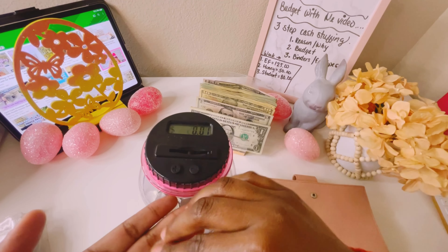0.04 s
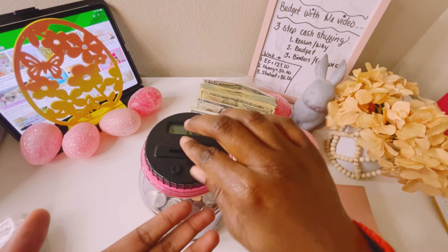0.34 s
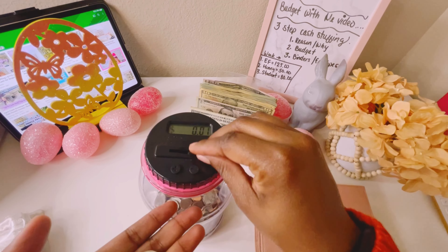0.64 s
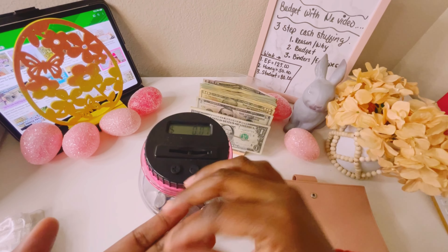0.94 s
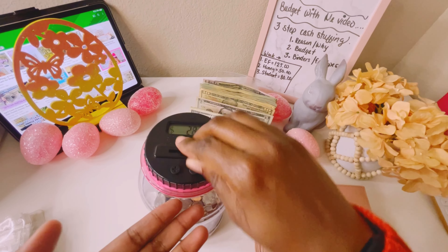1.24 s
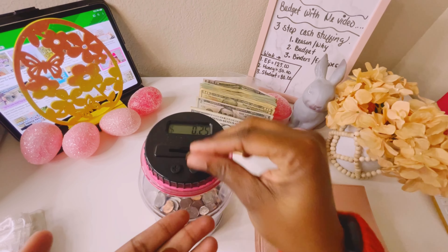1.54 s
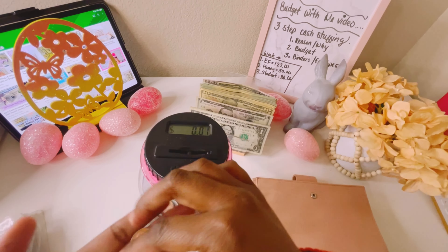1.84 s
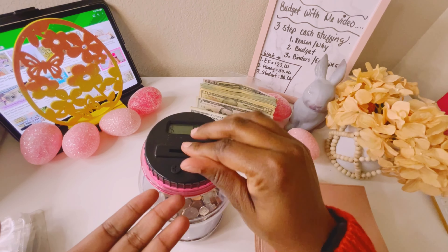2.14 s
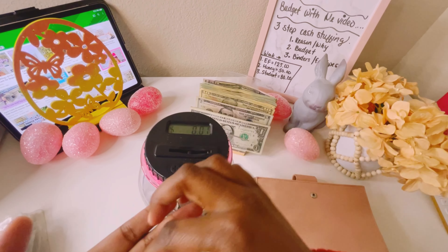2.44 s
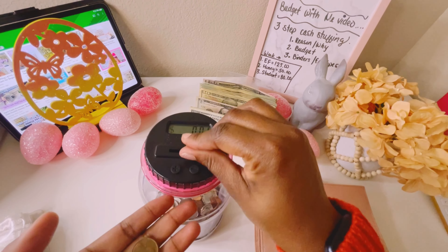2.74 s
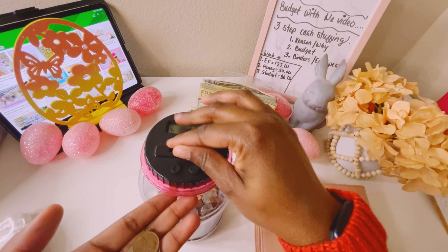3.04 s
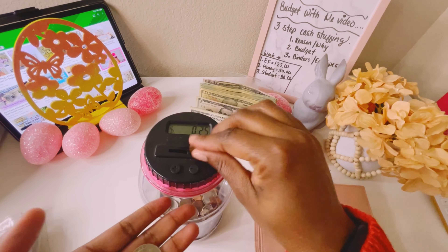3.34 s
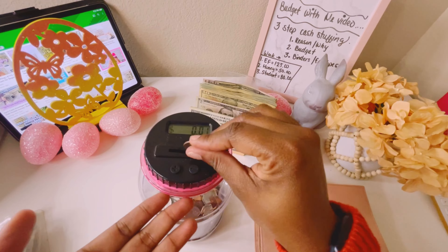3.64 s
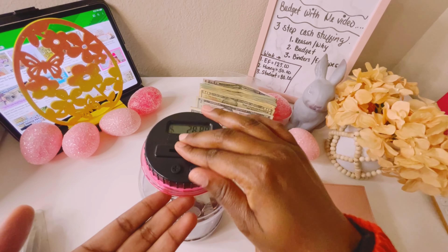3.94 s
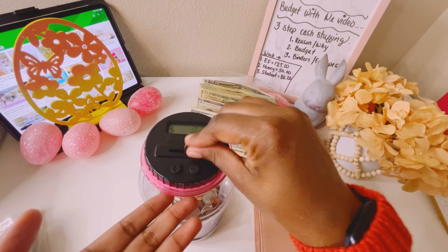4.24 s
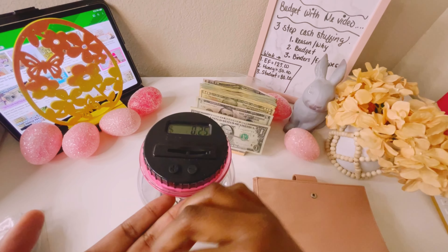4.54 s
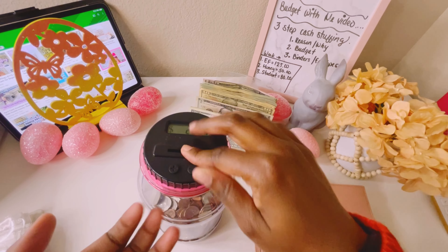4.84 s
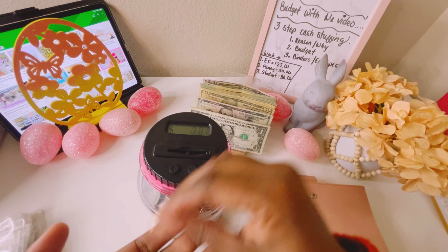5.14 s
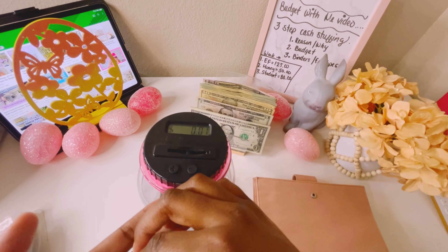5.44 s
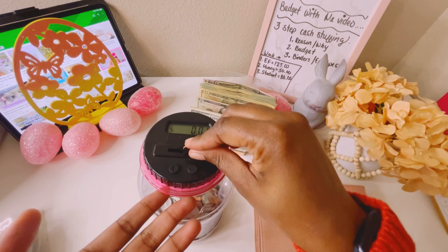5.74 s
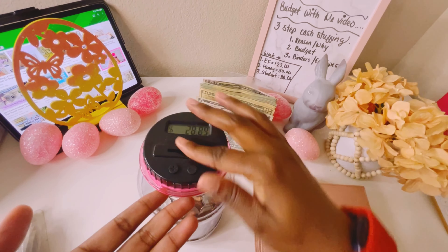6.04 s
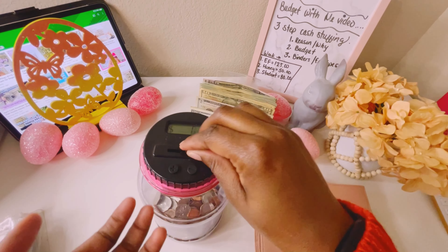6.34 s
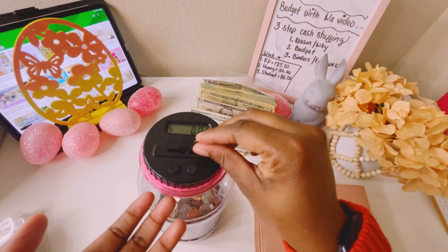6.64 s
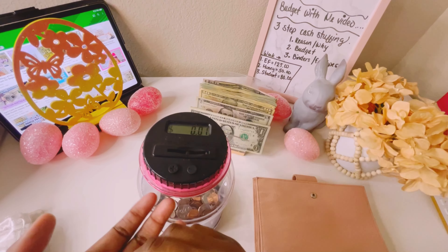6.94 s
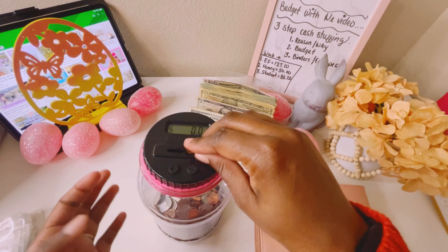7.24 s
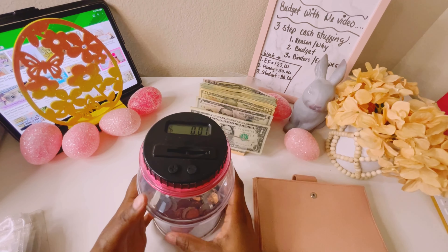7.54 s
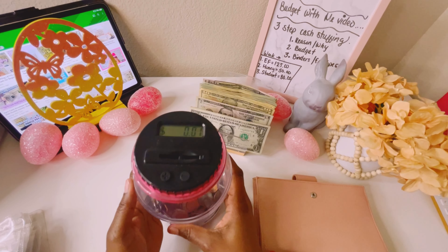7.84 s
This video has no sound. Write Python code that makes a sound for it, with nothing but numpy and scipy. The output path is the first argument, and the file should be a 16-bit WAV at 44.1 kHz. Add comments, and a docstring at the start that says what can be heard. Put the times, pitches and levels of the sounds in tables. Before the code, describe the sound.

Coins are pushed one after another through the sprung slot in the lid of a plastic jar, close to the microphone on a desk in a small room. Each taps and scrapes, the flap snaps back, and the coin lands on the pile with a brief jingle. Spare coins clink faintly in a palm. Near the end fingers softly rub the jar, and a steady appliance hum drops to a lower drone with a soft rustle.

```python
"""Coins snap one by one through the sprung slot in the lid of a plastic counting jar, close up on a desk. Coins
tap on the lid or the pile and scrape in the slot; the flap snaps back, and each coin drops inside. Every
contact rings the lid, the coin, the jar's wall and the air within. Spare coins clink in the palm and fingers
rub on the jar. An appliance hums in the small room; near the end the background gives way abruptly to a low
drone, with a soft rustle."""
import sys
import numpy as np
from scipy import signal
from scipy.fft import rfft, irfft, next_fast_len
from scipy.io import wavfile
from scipy.ndimage import map_coordinates

SR = 44100
rng = np.random.default_rng(int(sys.argv[2]) if len(sys.argv) > 2 else 0)


def inscribe(sig):
    """Save sig as 16-bit PCM at rate SR to the path in sys.argv[1].

    A 1-D sig is mono; a 2-D sig holds one channel per row.
    Samples are clipped to [-1, 1] before scaling.
    """
    pcm = np.round(np.clip(np.atleast_2d(sig).T, -1, 1) * 32767)
    wavfile.write(sys.argv[1], SR, pcm.astype(np.int16))


N = 356317

# Knock is the jar's dull body relative to a hit's level; treble is the coin's tick over the lid's clack.
# a coin goes through the slot: snap t/s, snap level/dB, knock/dB, treble/dB, rebound level/dB,
# fall time/s, landing level/dB, landing treble/dB, settling level/dB
COIN_DROPS = [(.0035, -19.5, -18, 2.5, -30.5, 0.033, -33, -4.5, -52.5),
              (0.3857, -18.5, -15.5, 6, -22, 0.033, -28.5, -7.5, -36.5),
              (0.8047, -16.5, -16, 4, -29.5, 0.028, -24, 1, -54.5),
              (1.35, -19.5, -10.5, -4, -15.5, 0.031, -24, -1, -44.5),
              (1.7513, -17.5, -15.5, 2, -29.5, 0.032, -26, -4, -46),
              (2.3209, -14, -14, 5, -33.5, 0.042, -23.5, -.5, -37),
              (3.0898, -19.5, -24.5, 1, -37, 0.024, -24, -8, -36.5),
              (3.4277, -16.5, -21.5, 5, -15.5, 0.025, -27.5, 2, -36),
              (3.9454, -17.5, -28, 3.5, -40, 0.021, -23.5, -5, -40),
              (4.4363, -17.5, -28, -2.5, -30, .0246, -21, -1.5, -48),
              (4.8211, -20, -16, 1, -22.5, .0359, -25.5, -4.5, -35.5),
              (5.319, -17, -22.5, 3.5, -18.5, 0.029, -19.5, 4.5, -37.5),
              (6.0197, -16, -14, 0, -28.5, 0.027, -28.5, -3, -37.5),
              (6.415, -19, -24.5, 3.5, -17, 0.036, -20, -3.5, -48),
              (6.8572, -15.5, -22.5, 5.5, -35.5, .0229, -21.5, 1, -42.5),
              (7.2916, -15.5, -18, 3, -20, 0.031, -22, 2.5, -46)]
# a coin taps on the lid or on the pile in the jar, and skips: t/s, level/dB, treble/dB
COIN_TAPS = [(0.188, -29, -7), (0.1997, -31.5, -5.5), (.248, -44.5, -4), (0.304, -37.5, -6.5),
             (0.6207, -27, -11.5), (.706, -44.5, -1), (0.723, -36.5, -2), (0.7802, -19, -1),
             (.822, -20.5, -5), (1.0422, -24.5, -18), (1.063, -24.5, -6.5), (1.2055, -25, -2.5),
             (1.2457, -31, -10), (1.2638, -44.5, 4), (1.6, -25.5, -7), (1.7046, -37.5, 2),
             (2.0493, -33, -6.5), (2.0832, -38.5, -2.5), (2.1127, -31.5, 6), (2.3437, -28, -1.5),
             (2.5842, -26, 1.5), (2.6616, -51, -11), (2.7028, -26, -2), (2.9, -45.5, -22),
             (2.9157, -33, -10), (2.9442, -32, -13.5), (2.9818, -32.5, -15), (2.9935, -24.5, -5),
             (3.016, -26.5, -0.5), (3.0705, -18.5, -12), (3.1684, -35.5, -1.5), (3.2997, -27.5, -8.5),
             (3.3597, -27.5, -1.5), (3.371, -27.5, 7.5), (3.641, -29.5, -20), (3.653, -25.5, -9.5),
             (3.6854, -28.5, -10), (3.7456, -39.5, -13), (3.7983, -29.5, 4), (3.842, -27, -10),
             (4.187, -34, 6), (4.216, -33, -9.5), (4.2774, -34.5, -11), (4.3186, -39, 2), (4.3736, -29, -7),
             (4.4171, -29.5, 4), (4.623, -52.5, -3), (4.67, -29.5, -4.5), (4.71, -47, 6),
             (4.7414, -41.5, 4), (4.776, -38.5, -2.5), (5.2137, -26, -8.5), (5.2643, -34, 2.5),
             (5.5628, -28, -5.5), (5.661, -24.5, -2.5), (5.8097, -39, -2), (5.9446, -22, -3.5),
             (6.093, -34.5, 0.5), (6.237, -55, 0), (6.272, -33, -3), (6.305, -30.5, 2), (6.3205, -31, 13.5),
             (6.36, -32, -4.5), (6.492, -37.5, 1), (6.6463, -37.5, -14), (6.6938, -28.5, 0.5),
             (6.7689, -31, -3.5), (6.803, -38, -1.5), (6.958, -38.5, -2.5), (6.9766, -33, 0),
             (7.169, -33.5, -1.5), (7.2065, -33, 3.5)]
# a coin scrapes in the slot: start t/s, end t/s, level/dB, knock/dB, treble/dB
SLOT_SCRAPES = [(0.033, 0.058, -39, -8, -1.5), (0.638, 0.673, -50, -2.5, -4),
                (1.043, 1.072, -33.5, -5.5, -11.5), (1.139, 1.171, -52, 2, -13),
                (1.193, 1.227, -32.5, -2, -10), (1.718, 1.751, -52, 2.5, -7.5),
                (2.314, 2.319, -19.5, -9.5, 1.5), (2.716, 2.748, -42, -0.5, 0),
                (2.996, 3.043, -31.5, -4.5, -9), (3.07, 3.087, -29, -1, -4),
                (3.785, 3.851, -36.5, -1.5, -14), (3.933, 3.945, -30, -2.5, -8),
                (4.18, 4.186, -28.5, -7.5, -13.5), (4.267, 4.299, -44, 1.5, -5),
                (4.357, 4.387, -32, -4, -5.5), (4.41, 4.436, -23.5, -8, -10.5), (4.75, 4.81, -54, -1, -10),
                (5.795, 5.817, -47, 1.5, -6), (5.935, 5.974, -31.5, -2.5, -4.5),
                (6.007, 6.019, -21.5, -7.5, -9), (6.409, 6.417, -23, -14.5, 5)]
# resonances of lid, coin, jar wall, enclosed air and palm-held coin rims: f/Hz, width/Hz, level/dB
LID_MODES = [(2760, 300, -4), (3158, 120, 0), (3340, 110, -3), (3624, 140, 5), (3928, 810, -1.5),
             (4675, 91, -1), (4673, 340, -0.5), (5260, 280, -0.5), (5690, 890, -6.5)]
COIN_MODES = [(7060, 4500, -4), (8020, 150, 4), (9920, 520, 3), (10800, 800, -2.5), (11270, 760, 0),
              (12750, 280, -6), (12900, 2200, -5), (15440, 600, -3), (14900, 430, -6)]
WALL_MODES = [(729, 190, -5.5), (847, 137, 1), (1190, 100, 0.5), (1387, 150, 0), (1777, 280, -6)]
CAVITY_MODES = [(389.6, 60.4, 7.5), (435, 93, -2)]
RIM_MODES = [(9500, 4500, -17.5), (11100, 540, -12.5), (14100, 680, -0.5), (15500, 450, -1.5),
             (17370, 1100, 6)]
# coins slide over each other in the palm: start t/s, length/s, level/dB
PALM_SLIDES = [(0.052, 0.0087, -42), (0.905, .033, -40.5), (1.467, 0.039, -38.5), (1.857, .008, -47),
               (2.434, 0.03, -35.5), (3.222, 0.0088, -32.5), (3.547, 0.0096, -46.5), (4.041, 0.022, -45),
               (5.126, .002, -32), (5.441, 0.048, -40)]
# fingers slide on the jar: middle t/s, length/s, level/dB
FINGER_RUBS = [(0.497, .1, -65), (1.478, 0.093, -61), (2.551, .12, -65.5), (3.23, .1, -60.5),
               (4.084, .15, -62.5), (5.82, .14, -63), (6.152, 0.073, -68), (7.188, 0.17, -64.5),
               (7.372, 0.067, -49.5), (7.518, 0.21, -67.5), (7.685, .04, -60)]
# fingernails tick on the jar: t/s, level/dB
NAIL_TICKS = [(7.473, -56), (7.574, -65), (7.666, -53)]
# the small room's decay: f/Hz, t60/s
ROOM_DECAY = [(300, .35), (1100, 0.36), (2200, 0.25), (4500, 0.15), (8000, 0.078), (15000, 0.022)]
# partials of the appliance's hum and of the low drone: f/Hz, level/dB
HUM_PARTIALS = [(88.9, -66), (177.8, -48.5), (182.4, -51.5), (193.6, -53.5), (223, -59.5), (255.5, -70),
                (266.8, -45.5), (283, -65), (365.2, -57), (444.6, -62.5)]
DRONE_PARTIALS = [(59.2, -45), (62, -64), (86.1, -46), (89, -54), (118.4, -58), (145.3, -56.5)]
# noise colours of skin on plastic, the room's air and the rustle: f/Hz, level/dB
RUB_COLOUR = [(200, -38.5), (500, -7.5), (800, 1.5), (1200, -1.5), (1600, -10), (3000, -11.5), (7000, -18),
              (15000, -19.5)]
AIR_COLOUR = [(30, -30), (90, -21), (130, -4), (180, 2), (220, -5), (270, 10), (315, -3.5), (390, -2.5),
              (500, -10), (650, -16.5), (1200, -28.5), (2500, -41), (6000, -45.5), (16000, -49)]
RUSTLE_COLOUR = [(88, -17), (150, 0), (171, 0.5), (790, -9.5), (970, -14.5), (1520, -16.5), (8460, -23.5),
                 (11400, -30), (13000, -87)]
# the closing rustle swells and fades: t/s, level/dB
RUSTLE_ENVELOPE = [(7.68, -95), (7.71, -58), (7.81, -49.5), (7.87, -52), (7.93, -73.5), (8.08, -72.5)]


def coin_drops(push_lead_s=0.011, rebound_s=0.007):
    """Each coin pushes the sprung flap open; it snaps back, and the coin lands on the pile."""
    hits = []
    for s, db, knock_db, treble_db, rebound_db, fall_s, landing_db, landing_treble_db, _ in COIN_DROPS:
        push = (max(s - push_lead_s, 0), db - 21.5, -6.5, -10)
        snap = (s, db, knock_db, treble_db)
        rebound = (s + rebound_s, rebound_db, -19, -2)
        landing = (s + fall_s, landing_db, -11, landing_treble_db)
        hits += [push, snap, rebound, landing]
    return coin_on_jar(hits, cavity_db=-10, wall_db=-1, lid_db=-1, coin_db=-2)


def pile_settling(count=9, wait_s=0.01, gap_s=0.0053, fade_db_per_s=175.5):
    """After each landing, neighbours in the pile shift in a quick, fading jingle."""
    hits = []
    for snap_s, *_, fall_s, _, _, db in COIN_DROPS:
        start = snap_s + fall_s + wait_s
        delays = gap_s * (np.arange(count) + rng.uniform(0, 0.72, count))
        hits += [(start + delay, db - fade_db_per_s * delay + rng.normal(0, 2.5), -11, 0)
                 for delay in delays]
    return coin_on_jar(hits, cavity_db=-10.5, wall_db=-2.5, lid_db=-2.5, coin_db=-4.5)


def coin_taps(skips=2, skip_s=0.016, skip_loss_db=14, usual_db=-30):
    """A coin taps on the lid or on the pile in the jar, and skips, softer each time."""
    hits = []
    for s, db, treble_db in COIN_TAPS:
        flights = skip_s * np.exp(0.35 * rng.standard_normal(skips))
        delays = np.r_[0, np.cumsum(flights)]
        knock_db = -11 - 0.24 * (db - usual_db)  # gentle taps are duller, with more of the jar's knock
        hits += [(s + delay, db - k * skip_loss_db, knock_db, treble_db)
                 for k, delay in enumerate(delays)]
    return coin_on_jar(hits, cavity_db=-10, wall_db=-2, lid_db=-2, coin_db=-2.5)


def slot_scrapes(count=11):
    """A sliding coin sticks and slips: a gritty run of small, uneven contacts."""
    hits = []
    for start, end, db, knock_db, treble_db in SLOT_SCRAPES:
        step = (end - start) / count
        slips = start + step * (np.arange(count) + rng.uniform(-0.51, 0.44, count))
        levels = db + 10 * np.log10(step / 0.0088) + rng.normal(0, 1, count)  # closer slips are softer
        hits += [(s, level, knock_db, treble_db) for s, level in zip(slips, levels)]
    return coin_on_jar(hits, cavity_db=-8, wall_db=1, lid_db=2, coin_db=0)


def coin_on_jar(hits, cavity_db, wall_db, lid_db, coin_db):
    """Hits (t/s, level/dB, knock/dB, treble/dB) layer a hollow knock, a lid clack and a coin tick."""
    s, db, knock_db, treble_db = np.transpose(hits)
    clack_db = db - 10 * np.log10(1 + amp(treble_db) ** 2)  # lid and coin share the level
    air = strike(s, db + knock_db + cavity_db, CAVITY_MODES,
                 graze_s=0.0045, spike=0.51, chatter_t60=0.036, detune=0.005, scatter_db=3, spread=0.2)
    wall = strike(s, db + knock_db + wall_db, WALL_MODES,
                  graze_s=0.0055, spike=0.77, chatter_t60=0.032, detune=0.0059, scatter_db=4, spread=0.8)
    lid = strike(s, clack_db + lid_db, LID_MODES,
                 graze_s=0.0036, spike=0.4, chatter_t60=0.026, detune=0.007, scatter_db=4, spread=0.65)
    coin = strike(s, clack_db + treble_db + coin_db, COIN_MODES,
                  graze_s=0.0065, spike=0.6, chatter_t60=0.026, detune=0.04, scatter_db=1.8, spread=0.8)
    return air + wall * amp([[1.2], [-1.2]]) + lid * amp([[1], [-1.1]]) + coin * amp([[2], [-2.4]])


def strike(times, db, modes, graze_s, spike, chatter_t60, detune, scatter_db, spread, size=4096):
    """Each blow is a brief graze, a sharp spike and a dying chatter, rung through the modes."""
    lead = size // 16
    t = (np.arange(size) - lead) / SR
    hz = np.fft.rfftfreq(size, 1 / SR)
    chance = rng.standard_normal((len(times), 3, size))
    envelope = amp(-60 * np.where(t < 0, -t / graze_s, t / chatter_t60))
    chatter = unit(chance[:, :2] * envelope)
    mid = chatter[:, 0] + spike * unit(1. * (t == 0))
    side = spread * chatter[:, 1]
    force = np.array([mid + side, mid - side])
    body = 0
    for k, (centre, width, level) in enumerate(modes):
        pitch = centre * np.exp(detune * chance[:, 2, :1])  # coins differ in size and striking spot
        strength = (-1) ** k * amp(level + scatter_db * chance[:, 2, k + 1, None])
        body = body + strength * 1j * hz * width / (pitch ** 2 - hz ** 2 + 1j * hz * width)
    edges = [0.8 * modes[0][0], 1.2 * modes[-1][0]]  # little radiates beyond the outer modes
    body = body * signal.freqs(*signal.butter(2, edges, "bandpass", analog=True), hz)[1]
    ring = irfft(rfft(force) * body, size) * signal.windows.tukey(size, 0.06)
    attack_rms = np.sqrt(np.mean(ring[..., lead:2 * lead] ** 2, axis=(0, 2)))
    ring = ring * (amp(db) / attack_rms)[:, None]  # the first 6 ms set a blow's level
    where = np.round((np.abs(times) + 0.0008) * SR).astype(int)[:, None] + np.arange(size)
    return np.array([np.bincount(where.ravel(), ear.ravel(), N + lead)[lead:N + lead] for ear in ring])


def palm_clinks(count=3):
    """Coins slide together in the palm, damped so that only their highest notes clink."""
    start, length, db = np.transpose(PALM_SLIDES)[..., None]
    chance = rng.standard_normal((len(PALM_SLIDES), 2, count))
    times = start + length * (np.linspace(0, 1, count) + 0.06 * chance[:, 0])
    levels = db + 2 * chance[:, 1]
    clinks = strike(times.ravel(), levels.ravel(), RIM_MODES,
                    graze_s=0.01, spike=0.8, chatter_t60=0.028, detune=0.008, scatter_db=2, spread=0.7)
    return clinks * amp([[1.5], [-3]])


def fingers():
    """Skin rubs in soft swells and nails tick as the fingers take hold of the jar."""
    t = np.arange(N) / SR
    grip = sum(amp(db) * np.exp(-(2 * (t - middle) / length) ** 2) for middle, length, db in FINGER_RUBS)
    rub = grip * amp(3.5 * wobble(90)) * noise(RUB_COLOUR, split_hz=900)  # skin catches and slips
    ticks = [(s, db, -8, -2) for s, db in NAIL_TICKS]
    return rub + coin_on_jar(ticks, cavity_db=-8.5, wall_db=-1, lid_db=-0.5, coin_db=-3.5)


def desk_thumps(gain_db=-37, desk_hz=42, t60=0.05):
    """Each snap pushes the jar against the desk, adding a faint low thump."""
    s, db = np.transpose(COIN_DROPS)[:2]
    pushes = np.bincount(np.round(np.abs(s) * SR).astype(int), amp(db + gain_db), N)[:N]
    t = np.arange(SR // 4) / SR
    thump = np.sin(2 * np.pi * desk_hz * t) * amp(-60 * t / t60)
    return signal.fftconvolve(pushes, thump)[:N]


def room(x, near_db=-13, near_t60=0.068, far_db=-18):
    """Desk and corner walls answer at once; the rest of the room leaves a faint, darkening tail."""
    hz, t, spectrum = signal.stft(rng.standard_normal((2, SR // 2)), SR, nperseg=256)
    decay = amp(-60 * t / along(ROOM_DECAY, hz)[:, None])
    far = signal.istft(spectrum * decay, SR, nperseg=256)[1]
    t = np.arange(far.shape[1]) / SR
    near = rng.standard_normal(far.shape) * amp(-60 * t / near_t60)
    answer = (amp(near_db) * unit(near) + amp(far_db) * unit(far)) / np.sqrt(len(t))
    return signal.fftconvolve(x, answer * np.clip(t / 0.004, 0, 1), axes=1)[:, :N]


def background(drop_s=7.7, crossfade_s=0.012):
    """A bed of motor hum and moving air; at 7.7 s it gives way abruptly to a low drone and a soft, grainy
    rustle."""
    t = np.arange(N) / SR
    late = np.clip((t - drop_s) / crossfade_s + 0.5, 0, 1)
    hum = tones(HUM_PARTIALS, drift_rad=0.28) + amp(-51.5) * noise(AIR_COLOUR, split_hz=670)
    rustle_db = np.interp(t, *np.transpose(RUSTLE_ENVELOPE)) + 1.1 * wobble(120)
    drone = tones(DRONE_PARTIALS, drift_rad=0.26) + amp(rustle_db) * noise(RUSTLE_COLOUR, split_hz=250)
    return ((1 - late) * hum + late * drone) * amp([[-0.9], [0.9]])


def tones(partials, drift_rad):
    """Steady sines whose phases wander slightly."""
    t = np.arange(N) / SR
    return sum(np.sqrt(2) * amp(db) * np.sin(2 * np.pi * (hz * t + rng.random()) + drift_rad * wobble(1.8))
               for hz, db in partials)


def noise(colour, split_hz):
    """Coloured stereo noise, centred below split_hz and wide above."""
    mid, side = filtered(rng.standard_normal((2, N)), lambda hz: amp(along(colour, hz)))
    side = filtered(side, lambda hz: hz ** 2 / (hz ** 2 + split_hz ** 2))
    return unit(np.array([mid + side, mid - side]))


def filtered(x, response):
    """x shaped by a complex frequency response."""
    size = next_fast_len(N + SR // 2)
    return irfft(rfft(x, size) * response(np.fft.rfftfreq(size, 1 / SR)), size)[..., :N]


def wobble(rate):
    """A smooth random curve, rate knots a second."""
    return map_coordinates(rng.standard_normal(int(N * rate / SR) + 4), [np.arange(N) * rate / SR])


def along(points, hz):
    """A curve through (f/Hz, value) points on a log frequency axis."""
    freqs, values = np.transpose(points)
    return np.interp(np.log(hz + 1), np.log(freqs), values)


def unit(x):
    """Each row at rms 1."""
    return x / np.sqrt(np.mean(x ** 2, axis=-1, keepdims=True) + 1e-20)


def amp(db):
    """Decibels to gain."""
    return 10 ** (np.asarray(db) / 20)


def scene():
    """Coins and hands up front and slightly left, over the room, the desk and the hum."""
    close = coin_taps() + slot_scrapes() + coin_drops() + pile_settling() + palm_clinks() + fingers()
    lag_s = np.array([[-2], [2]]) / SR  # the left ear hears it first
    close = filtered(close, lambda hz: np.exp(-2j * np.pi * hz * lag_s))
    return close + room(close) + desk_thumps() + background()


def record(dry, top_hz=16100):
    """A brick-wall low-pass trims the very top."""
    return filtered(dry, lambda hz: 1 / np.sqrt(1 + (hz / top_hz) ** 160))


dry = scene()
out = record(dry)
inscribe(out)
```